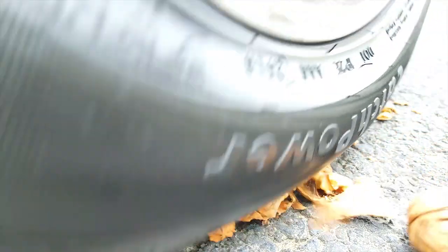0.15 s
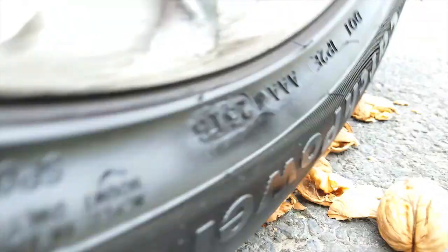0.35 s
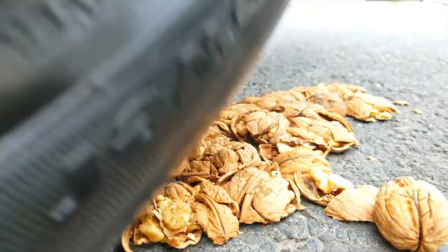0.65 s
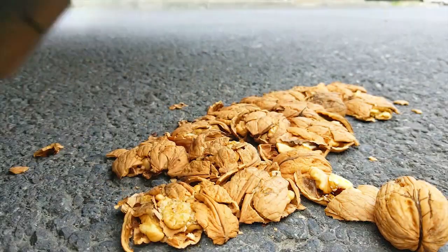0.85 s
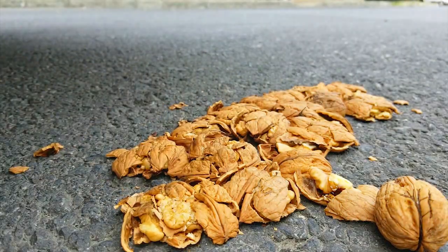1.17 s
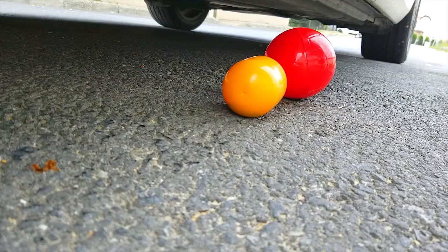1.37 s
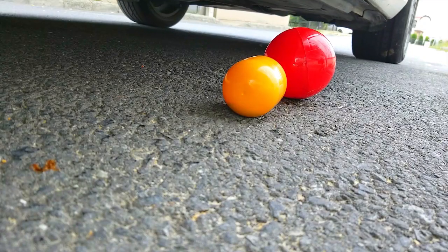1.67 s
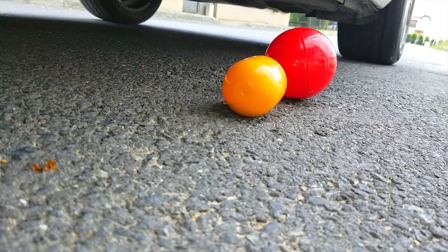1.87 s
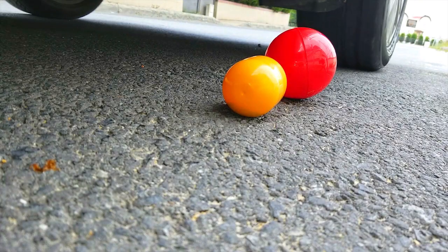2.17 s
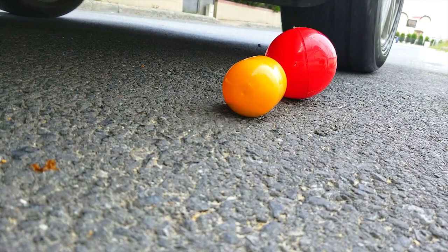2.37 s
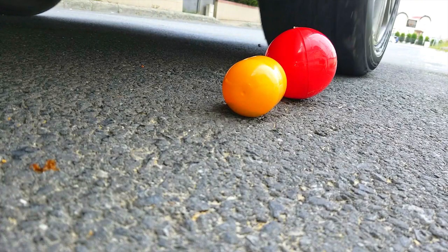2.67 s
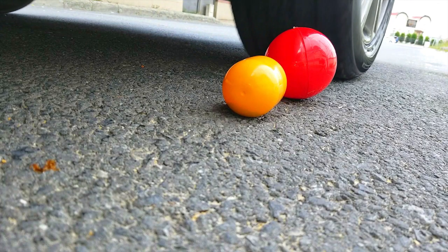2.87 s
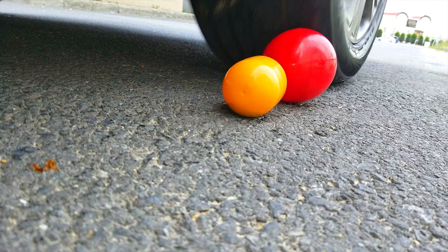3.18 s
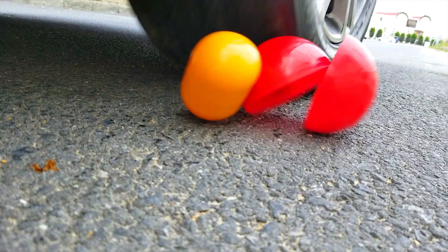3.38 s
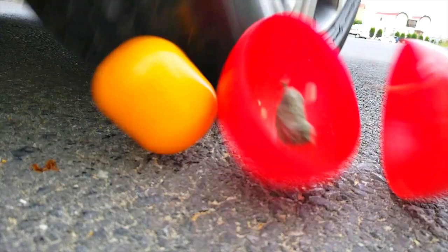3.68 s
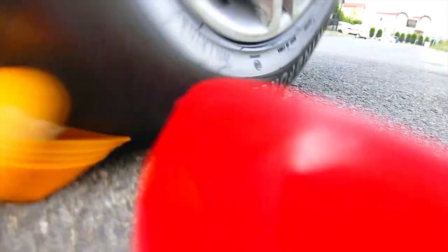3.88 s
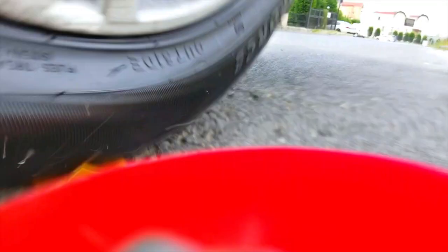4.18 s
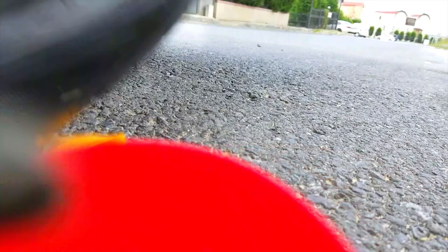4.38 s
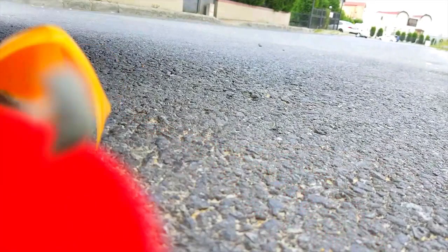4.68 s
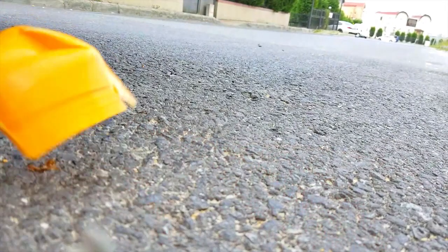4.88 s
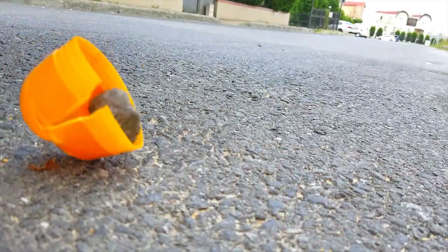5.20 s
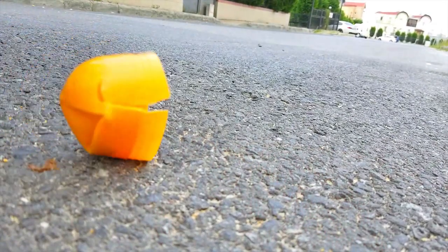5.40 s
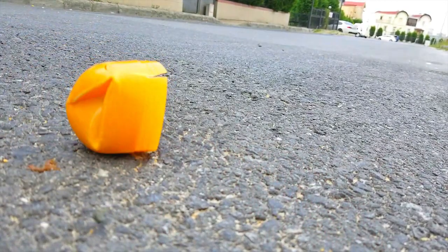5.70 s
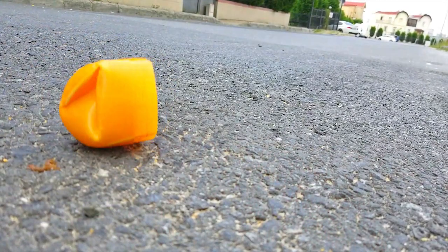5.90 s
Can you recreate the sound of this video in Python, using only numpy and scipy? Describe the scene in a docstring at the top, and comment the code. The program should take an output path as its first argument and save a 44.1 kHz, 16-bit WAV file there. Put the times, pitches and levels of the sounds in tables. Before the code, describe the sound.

Close, dry road-level sound outdoors, in three abruptly joined parts. From 0 to 0.5 s a tyre crushes walnuts: rapid irregular snaps, hollow woody knocks and bright splintering over gritty crunch, densest before 0.25 s. Faint crumbs tick from about 0.55 s while a low idling engine emerges; at 0.95 s comes a soft car knock, then a very thin, high brake squeal. At 1.27 s a hard cut brings a much fuller approaching car, its throbbing exhaust and tyre hiss dropping to a rougher idle, with a small surge near 1.95 s. At 2.15 s everything becomes quarter-speed, dark and treble-less: slow bass flutter under a dull rush. From 2.9 to 4.05 s plastic capsules creak and crack in deep, hollow, varied blows, some overloading. Loose halves then bounce, strongest around 4.7 s, rattling and rolling lightly until 6 s, with a faint lingering ring, as the car fades.

```python
"""A car tyre crunches walnuts on asphalt, close by, over the idling engine: noise bursts snap, knock and ring.
A soft knock of the car follows, and a brake sings faintly, as one sine. After a hard cut the car drives up:
firing pulses and throbbing noise. After a second cut all runs at quarter speed: the engine flutters slowly
under a dull rush. Two plastic capsules crack under the tyre, deep and dull, as dying modes and noise, and
their halves bounce, rattle and roll away."""
import sys
import numpy as np
from scipy import signal
from scipy.io import wavfile
from scipy.ndimage import uniform_filter1d

SR = 44100
rng = np.random.default_rng(int(sys.argv[2]) if len(sys.argv) > 2 else 0)


def master_out(mix):
    """Clip the mix to full scale and print it as 16-bit PCM to the path in sys.argv[1]."""
    frames = np.transpose(np.atleast_2d(mix))
    ceiling = np.clip(frames, -1, 1)
    pcm = np.round(ceiling * 32767).astype(np.int16)
    wavfile.write(sys.argv[1], SR, pcm)


N = 266805
TIME_S = np.arange(N) / SR

# Shell snaps, and one late soft knock of the car at 0.952 s.
# Each row: start in seconds, hollow knock level in dB, crack level in dB, both before trim.
NUT_AND_CAR_BLOWS = [(0.039, -20, -23.5), (0.066, -16, -28), (0.087, -38, -25.5), (0.115, -23.5, -54),
                     (0.142, -29, -37), (0.158, -24.5, -56), (0.17, -40, -29.5), (0.1799, -24.5, -24.5),
                     (0.2032, -19, -20.5), (0.214, -26, -22), (0.281, -25.5, -31), (0.316, -28, -29),
                     (0.321, -37, -29.5), (0.341, -29, -36), (0.366, -55, -35.5), (0.396, -32, -34),
                     (0.427, -29.5, -36.5), (0.493, -26, -37.5), (0.521, -26.5, -31.5), (0.952, -34, -66)]
# Spectrum of a hollow knock. Each row: frequency in Hz, level in dB per Hz.
NUT_KNOCK_SPECTRUM = [(120, -25.5), (200, 1.5), (220, -9), (274, -9.5), (307, -6.5), (530, 1.5),
                      (1200, -15.5), (1560, -46.5), (2640, -120)]
# Spectrum of a shell's crack. Each row: frequency in Hz, level in dB per Hz.
NUT_CRACK_SPECTRUM = [(590, -19), (1000, -8.5), (1350, -9.5), (1630, -11.5), (2550, -8), (2800, -10.5),
                      (5000, -8.5), (6500, -18.5), (11000, -120)]
# Spectrum of shell splinters. Each row: frequency in Hz, level in dB per Hz.
NUT_SPLINTER_SPECTRUM = [(4000, -12.5), (4700, -4.5), (5600, 4.5), (7000, -1.5), (8400, 0), (9900, -2.5),
                         (11000, 1.5), (12000, 2.5), (13200, 3.5), (14000, -7.5), (14600, -17.5),
                         (15500, -29.5)]
# Capsules cracking under the tyre. Each row: start in seconds, thud frequency in Hz, thud level in dB,
# ring frequency in Hz, ring level in dB before trim.
CAPSULE_CRACKS = [(2.9, 555, -17, 660, -12.5), (2.912, 520, -19.5, 793, -23), (2.937, 580, -26.5, 820, -28),
                  (2.961, 233, -12.5, 636, -16), (2.972, 115.7, -10.5, 1144, -20),
                  (3.004, 113, -16, 734, -17.5), (3.066, 103.5, -17, 1470, -15),
                  (3.094, 116, -27.5, 1330, -9), (3.181, 170, -23, 1230, -12),
                  (3.195, 218.6, -12.5, 1230, -15), (3.243, 230, -20, 1120, -21.5),
                  (3.298, 165, -29.5, 1153, -24), (3.322, 150, -18.5, 807, -15),
                  (3.339, 381, -20.5, 958, -15.5), (3.351, 410, -27.5, 1114, -11.5),
                  (3.412, 550, -30, 1010, -18.5), (3.472, 507, -25, 610, -17.5),
                  (3.518, 183, -13.5, 1440, -18), (3.552, 280, -30, 1130, -11.5),
                  (3.584, 152, -24.5, 930, -15), (3.641, 156.6, -9, 1480, -21.5),
                  (3.7, 270, -22, 1520, -15.5), (3.726, 550, -18, 1530, -16), (3.768, 276, -13.5, 930, -22),
                  (3.809, 342, -25, 1155, -19.5), (3.887, 105, -10, 846, -14),
                  (3.894, 253, -14, 620, -18.5), (3.972, 246, -26, 1070, -14),
                  (4.03, 544, -27, 1120, -14.5)]
# Spectrum of the capsule body. Each row: frequency in Hz, level in dB per Hz.
PLASTIC_BODY_SPECTRUM = [(210, -26.5), (350, 1.5), (436, -7), (550, 0.5), (675, -21.5), (731, -4), (910, 1),
                         (1220, -2.5), (1560, -1), (2000, -19.5), (2600, -17.5), (4400, -120)]
# Spectrum of the plastic's snap. Each row: frequency in Hz, level in dB per Hz.
PLASTIC_SNAP_SPECTRUM = [(1000, -36.5), (1700, 1.5), (2010, 1.5), (2560, 0.5), (2830, -2.5), (3370, 5),
                         (3820, 1), (4000, -4), (5200, -51), (8800, -120)]
# Position of the plastic as it is pushed along. Each row: time in seconds, left over right in dB.
PLASTIC_PAN = [(2.9, 1), (3.33, 1), (3.5, 6.5), (3.9, 5), (4.15, 8.5), (4.7, 9.5), (5.1, 4), (5.4, -3.5),
               (5.8, 5)]
# Loose halves landing on the road. Each row: start in seconds, thud level in dB, ring level in dB before trim.
HALF_BOUNCES = [(4.161, -21, -26), (4.22, -21.5, -43), (4.285, -31, -36), (4.364, -30, -29),
                (4.369, -18.5, -15.5), (4.619, -17.5, -27.5), (4.686, -11, -25.5), (4.707, -25.5, -25.5),
                (4.725, -16.5, -19), (4.743, -22, -19), (4.758, -20, -25), (4.806, -23, -29),
                (4.9, -35, -39), (4.966, -34, -44), (5.029, -29, -32.5), (5.074, -37.5, -35.5),
                (5.088, -22.5, -32), (5.22, -34, -46), (5.272, -41, -41), (5.362, -24.5, -30.5),
                (5.407, -26.5, -34), (5.42, -32.5, -29.5), (5.537, -33.5, -39.5), (5.581, -33.5, -42.5),
                (5.775, -34, -33), (5.821, -36.5, -31), (5.854, -32.5, -27.5), (6.035, -52, -37.5)]
# Long faint ring of a shell flung against the road. Each row: frequency in Hz, starting level in dB, t60 in seconds.
SHELL_RING_MODES = [(2880, -60, 1.7), (3311, -65.5, 0.74), (3330, -62.5, 2.4)]
# Plastic straining under the tread. Each row: start in seconds, length in seconds, level in dB.
PLASTIC_CREAKS = [(2.898, 0.19, -18.5), (3.639, 0.12, -24), (3.886, 0.083, -25)]
# Spectrum of the plastic's low groan. Each row: frequency in Hz, level in dB per Hz.
GROAN_SPECTRUM = [(60, 4.5), (160, 3.5), (330, -4), (560, -9.5), (800, -7.5)]
# Engine speed as the car drives up. Each row: time in seconds, firings per second.
DRIVE_FIRING_RATE = [(1.28, 48.6), (1.35, 48.3), (1.52, 38.8), (1.64, 35.5), (2.13, 39.8)]
# Spectrum of the driving exhaust pipe. Each row: frequency in Hz, level in dB per Hz.
DRIVE_PIPE_SPECTRUM = [(35, -12), (48, -8.5), (75, -2), (125, -3.5), (172, 4), (205, -10), (330, -14.5),
                       (440, -31), (550, -25), (700, -17)]
# Spectrum of the driving tyres. Each row: frequency in Hz, level in dB per Hz.
DRIVE_ROAR_SPECTRUM = [(150, -28.5), (260, -7.5), (343, -7), (437, -11), (691, -10.5), (896, -18.5),
                       (1100, -17), (1430, -46.5), (2420, -120)]
# Spectrum of the driving car's hiss. Each row: frequency in Hz, level in dB per Hz.
DRIVE_HISS_SPECTRUM = [(530, -19), (900, 1), (1070, -10), (1230, -0.5), (1470, -1.5), (1770, 3.5),
                       (1950, 0), (2830, -1.5), (3150, -5.5), (4520, -7.5), (5280, -11.5), (7770, -8),
                       (9310, -17), (15200, -14), (16000, -20.5)]
# Loudness of the car passing at quarter speed. Each row: time in seconds, relative level in dB.
PASSING_LEVEL = [(2.17, -0.5), (2.56, 2), (2.8, -1.5), (3.15, 0), (3.42, -4.5), (3.72, 1.5), (4.1, -10),
                 (4.55, -18.5), (4.82, -14), (5.2, -17), (6, -21.5)]
# Spectrum of the slowed exhaust pipe. Each row: frequency in Hz, level in dB per Hz.
SLOW_PIPE_SPECTRUM = [(8.8, -24), (15, 7), (28, -3.5), (65, -9.5), (124, -13), (178, -26), (206, -44.5),
                      (220, -30.5), (290, -56), (480, -120)]
# Spectrum of the slowed tyres. Each row: frequency in Hz, level in dB per Hz.
SLOW_ROAR_SPECTRUM = [(100, -18), (170, 4.5), (215, -9.5), (303, -7.5), (392, -7), (486, -6), (617, -14),
                      (800, -27), (1040, -42.5), (1760, -120)]
# Spectrum of the slowed hiss. Each row: frequency in Hz, level in dB per Hz.
SLOW_HISS_SPECTRUM = [(380, -14.5), (650, 2), (696, -1), (995, -5), (1190, -3.5), (1430, -5), (1550, 0.5),
                      (1800, -13), (2020, -10.5), (2420, -10), (2950, -11.5), (3440, -5.5), (4000, -16),
                      (5200, -65), (8800, -120)]
# Car beside the nuts. Each row: time in seconds, firing hum level in dB, rumble level in dB, both before trim.
IDLE_LEVELS = [(0.0, -56.5, -49), (0.654, -33.5, -36), (1.25, -31, -39.5)]
# Spectrum of the idling exhaust. Each row: frequency in Hz, level in dB per Hz.
IDLE_RUMBLE_SPECTRUM = [(29, -30), (50, -10), (65, -9.5), (228, -21), (258, -29), (278, -23.5),
                        (411, -34.5), (483, -31), (1000, -55), (1300, -101.5), (2200, -120)]
# Spectrum of the idling car's hiss. Each row: frequency in Hz, level in dB per Hz.
IDLE_HISS_SPECTRUM = [(530, -13.5), (900, -1), (975, -7), (1770, -8.5), (5400, -24.5), (6270, -31.5),
                      (7280, -19.5), (7880, -16.5), (8740, -36.5), (12100, -21), (14000, -46)]
# Brake squeal. Each row: time in seconds, level in dB before trim.
BRAKE_LEVEL = [(0.9, -116), (0.966, -46.5), (1.26, -76)]
# Whines under the idling car. Each row: frequency in Hz, level in dB.
WHINE_BANDS = [(1830, -62), (2880, -69)]

CUT_S, SLOW_S = 1.272, 2.148
NUT_EDGE_HZ, SLOW_EDGE_HZ, EDGE_HZ = 14500, 4050, 16000
# harder cracks throw disproportionately more splinters (dB per dB)
SPLINTER_FROM_DB, SPLINTER_GROWTH = -34.5, 1.3
# the crunch holds while the tread is on the shells, then dies to the ticking of settling crumbs
CRUNCH_DB, CRUNCH_SAG_DB_PER_S, SETTLE_DB = -32.5, 7.5, -65.5
TREAD_OFF_S, CRUNCH_RELEASE_DB_PER_S = 0.38, 195
DEBRIS_FROM_S = 0.556
# the snap grows with the stronger of thud and ring (dB per dB)
SNAP_DB, SNAP_GROWTH = -16, 0.48
# the wall gives a little before it breaks: this much earlier (range) and weaker
GIVE_S, GIVE_DB = (0.004, 0.01), -14
# air and wall of a half; the spread is the standard deviation of log pitch between landings
CUP_HZ, WALL_HZ, PITCH_SPREAD = 267.3, 1042, 0.051
FREE_CUP_CYCLES = 2.2
BOUNCE_SNAP_DB = -8.5  # relative to the ring
# a pebble inside the cup rattles: this much later (range) and weaker
RATTLE_S, RATTLE_DB = (0.015, 0.028), -15.5
ROLL_S, ROLL_DB = (4.8, 5.75), -40
FLUNG_S = 4.745
CREAK_ATTACK_S, CREAK_RELEASE_DB_PER_S = 0.017, 211
# each part fades as the throttle closes
PIPE_EASE_DB_PER_S, ROAR_EASE_DB_PER_S, HISS_EASE_DB_PER_S = 15.5, 6, 5
# the low rumble swells once
SURGE_S, SURGE_WIDTH_S, SURGE_DB = 1.95, 0.032, 6
# how far bass and hiss follow the tyre roar (dB per dB)
PIPE_FOLLOWS, HISS_FOLLOWS = 1.09, 1.22
PIPE_LAG_S = 0.18  # the tailpipe passes after the wheel
BRAKE_HZ = 7670


def amp(db):
    """Decibels to gain."""
    return 10 ** (np.asarray(db) / 20)


def unit(x):
    """Scales to rms 1."""
    return x / np.sqrt(np.mean(x ** 2) + 1e-20)


def blow(x):
    """Scales a two-channel blow to the energy of 10 ms at rms 1."""
    mean_energy = np.sum(x ** 2) / 2
    return x / np.sqrt(mean_energy / (SR / 100) + 1e-20)


def curves(rows):
    """Each column of a table as a curve over the whole time."""
    time_s, *columns = np.transpose(rows)
    return [np.interp(TIME_S, time_s, column) for column in columns]


def after(s):
    """Seconds gone by since time s, zero before it."""
    return np.maximum(TIME_S - s, 0)


def colour(x, spectrum, size=4096):
    """Minimum-phase filter with the given spectrum, falling 40 dB per octave outside it."""
    hz, db = np.transpose(spectrum)
    octave = np.log2(np.abs(np.fft.fftfreq(size, 1 / SR)) + 1)
    knots = np.log2(hz + 1)
    outside = np.abs(octave - np.clip(octave, knots[0], knots[-1]))
    gain_db = np.maximum(np.interp(octave, knots, db) - 40 * outside, -100)
    log_gain = np.log(amp(gain_db))
    taps = np.fft.ifft(np.exp(np.conj(signal.hilbert(log_gain)))).real
    return signal.fftconvolve(x, taps[None], axes=1)[:, :x.shape[1]]


def lowpass(x, hz):
    """Steep linear-phase band limit."""
    taps = signal.firwin(801, hz, window=("kaiser", 9), fs=SR)
    return signal.oaconvolve(x, taps[None], "same")


def pair(size, shared):
    """White noise at two microphones with a share of power in common."""
    noise = rng.standard_normal((3, size))
    shared = np.clip(shared, 0, 1)
    return np.sqrt(shared) * noise[2] + np.sqrt(1 - shared) * noise[:2]


def clumps(size, span_s, depth_db):
    """Random gain that bunches a noise into grains about span_s long."""
    span = max(int(span_s * SR), 1)
    sway = unit(uniform_filter1d(rng.standard_normal(size), span))
    return unit(amp(depth_db * np.clip(sway, -2, 2)))


def panned(x, pan_db):
    """Leans a sound to the left by pan_db."""
    return x * amp([[pan_db / 2], [-pan_db / 2]])


def placed(x, pan_db, lead_s):
    """Leans a sound to the left by pan_db and delays the right by lead_s."""
    left, right = x
    delay = int(max(lead_s, 0) * SR)
    late_right = np.pad(right, (delay, 0))[:len(left)]
    return panned(np.array([left, late_right]), pan_db)


def add(mix, s, sound):
    """Mixes a sound in at time s."""
    start = max(round(s * SR), 0)
    part = mix[:, start:][:, :sound.shape[1]]
    part += sound[:, :part.shape[1]]


def mode(t, hz, fall_s):
    """A sine dying by 1/e in fall_s."""
    return np.sin(2 * np.pi * hz * t) * np.exp(-t / fall_s)


def rung(x, t, hz, fall_s):
    """Passes a blow through one resonance."""
    ringing = signal.fftconvolve(x, mode(t, hz, fall_s)[None], axes=1)
    return blow(ringing[:, :x.shape[1]])


def fracture(t, fall_s, tail_db, tail_s, shared, grain_s, grain_db):
    """A run of tiny uneven breaks that dies fast, plus the longer scatter of its fragments."""
    breaks = pair(len(t), shared) * np.exp(-t / fall_s)
    scatter = amp(tail_db) * pair(len(t), 0) * np.exp(-t / tail_s)
    return (breaks + scatter) * clumps(len(t), grain_s, grain_db)


def wash(spectrum, level_db, shared, throb=1):
    """Coloured noise on a level curve, pulsing with throb."""
    return amp(level_db) * unit(colour(pair(N, shared) * throb, spectrum))


def exhaust(firing_hz, spectrum, uneven, rough, shared):
    """One pulse and one puff of gas a firing, through the pipe; also returns the throb."""
    turns = np.cumsum(firing_hz) / SR
    firings = np.diff(np.floor(turns), prepend=0)
    pulses = firings * (1 + uneven * rng.standard_normal(N))
    throb = unit(1 + np.exp(-(turns % 1) / 0.505))
    gas = unit(pulses - pulses.mean()) + rough * throb * pair(N, shared)
    return unit(colour(gas, spectrum, size=16384)), throb


def walnuts_and_car_knock(knock_db=-3.5, crack_db=-1, splinter_db=-1, chip_db=-5, shard_db=-6,
                          pan_db=2.5, pan_spread_db=2):
    """Shells snap, knock hollow and ring a chip and a shard; the late car knock is nearly all hollow knock."""
    out, t = np.zeros((2, N)), np.arange(SR // 6) / SR
    for s, knock, crack in NUT_AND_CAR_BLOWS:
        splinter = SPLINTER_FROM_DB + SPLINTER_GROWTH * (crack - SPLINTER_FROM_DB)
        split = fracture(t, fall_s=0.0022, tail_db=-9.5, tail_s=0.0081, shared=0.328, grain_s=0.0004, grain_db=-1.5)
        push = fracture(t, fall_s=0.00077, tail_db=-23.5, tail_s=0.015, shared=0.96, grain_s=0.0013, grain_db=-1.5)
        sound = amp(knock + knock_db) * blow(colour(push, NUT_KNOCK_SPECTRUM))
        sound += amp(crack + crack_db) * blow(colour(split, NUT_CRACK_SPECTRUM))
        sound += amp(crack + chip_db) * rung(push, t, rng.uniform(1550, 1850), fall_s=0.0023)
        shard = amp(shard_db) * rung(push, t, rng.uniform(10530, 13710), fall_s=0.0012)
        bright = blow(colour(split, NUT_SPLINTER_SPECTRUM)) + shard
        sound += amp(splinter + splinter_db) * panned(bright, pan_db=7)
        add(out, s, placed(sound, pan_db + pan_spread_db * rng.uniform(-1, 1), lead_s=0.0004))
    return out


def crumbs(per_s=2500, spread_db=3, knock_db=-4, crack_db=-6, splinter_db=-1):
    """Countless small fragments break in clusters between the large snaps."""
    crunch = CRUNCH_DB - CRUNCH_SAG_DB_PER_S * TIME_S - CRUNCH_RELEASE_DB_PER_S * after(TREAD_OFF_S)
    level_db = np.maximum(crunch, SETTLE_DB)
    breaks = rng.random(N) < per_s / SR
    sizes = amp(spread_db * np.minimum(rng.exponential(1, N), 3)) * breaks
    grains = sizes * clumps(N, span_s=0.0057, depth_db=4.5) * pair(N, 0.3)
    sound = amp(knock_db) * unit(colour(grains, NUT_KNOCK_SPECTRUM))
    sound += amp(crack_db) * unit(colour(grains, NUT_CRACK_SPECTRUM))
    sound += amp(splinter_db) * unit(colour(grains, NUT_SPLINTER_SPECTRUM))
    return panned(amp(level_db) * sound, pan_db=0.5)


def debris(gap_s=0.05, slowing=1.2, first_db=-48, step_db=-3, count=5):
    """Bits of shell drop off the tread with fainter ticks, at gaps that tend to widen."""
    out, t, s = np.zeros((2, N)), np.arange(SR // 10) / SR, DEBRIS_FROM_S
    for k in range(count):
        tick = fracture(t, fall_s=0.0011, tail_db=-24, tail_s=0.015, shared=0.37, grain_s=0.0004, grain_db=-8)
        add(out, s, amp(first_db + k * step_db) * blow(colour(tick, NUT_SPLINTER_SPECTRUM)))
        s += gap_s * slowing ** k * rng.uniform(0.8, 1.2)
    return out


def plastic(s, thud_hz, thud, ring_hz, ring, snap, ring_db=-1, body_db=-4, high_db=-4, rise_s=0.0014, cup_cycles=0.94):
    """One blow at time s snaps the plastic, rings its wall and thumps the air in the cup."""
    t = np.arange(SR // 5) / SR
    split = fracture(t, fall_s=0.0077, tail_db=-26.5, tail_s=0.035, shared=0.081, grain_s=0.0021, grain_db=1.5)
    push = fracture(t, fall_s=0.0014, tail_db=-24.0, tail_s=0.022, shared=0.3, grain_s=0.0037, grain_db=2.5)
    cup = mode(t, thud_hz, cup_cycles / thud_hz) * (1 - np.exp(-t / rise_s)) * np.ones((2, 1))
    sound = amp(thud) * blow(cup)
    sound += amp(ring + ring_db) * rung(push, t, ring_hz, fall_s=0.0037)
    sound += amp(ring + body_db) * blow(colour(split, PLASTIC_BODY_SPECTRUM))
    # each point of impact favours another high mode of the wall
    high = amp(high_db) * rung(push, t, rng.uniform(2000, 3853), fall_s=0.0023)
    sound += amp(snap) * blow(blow(colour(split, PLASTIC_SNAP_SPECTRUM)) + high)
    pan_db = np.interp(s, *np.transpose(PLASTIC_PAN))
    # only pieces far to the left reach one microphone clearly first; slowing stretches that lead
    lead_s = np.interp(pan_db, [6, 8.5], [0, 0.003])
    return s, placed(sound, pan_db, lead_s)


def capsules():
    """The capsules give way crack by crack; as they cave in, each crack has its own pitches."""
    out = np.zeros((2, N))
    for s, thud_hz, thud, ring_hz, ring in CAPSULE_CRACKS:
        snap = SNAP_DB + SNAP_GROWTH * max(thud, ring)
        early_s = s - rng.uniform(*GIVE_S)
        add(out, *plastic(early_s, thud_hz, thud + GIVE_DB, ring_hz, ring + GIVE_DB, snap + GIVE_DB))
        add(out, *plastic(s, thud_hz, thud, ring_hz, ring, snap))
    return out


def landing(s, thud, ring, bump_hz=170, bump_db=-11, bump_s=0.008):
    """A loose half bumps the road; with no load its cup rings longer and purer, near its own two pitches."""
    cup, wall = np.exp(PITCH_SPREAD * rng.standard_normal(2))
    _, sound = plastic(s, CUP_HZ * cup, thud, WALL_HZ * wall, ring, ring + BOUNCE_SNAP_DB,
                       ring_db=-1.5, body_db=-5.5, high_db=-5.5, cup_cycles=FREE_CUP_CYCLES)
    bump = blow(mode(TIME_S[:sound.shape[1]], bump_hz, bump_s) * np.ones((2, 1)))
    return s, sound + amp(thud + bump_db) * panned(bump, pan_db=5.5)


def halves(roll_ring_db=-7, count=15):
    """The loose halves bounce, rattle and roll on the rim in light taps; a flung shell rings on faintly."""
    out, t = np.zeros((2, N)), np.arange(SR) / SR
    for s, thud, ring in HALF_BOUNCES:
        add(out, *landing(s, thud, ring))
        add(out, *landing(s + rng.uniform(*RATTLE_S), thud + RATTLE_DB, ring + RATTLE_DB))
    for s in np.interp(np.arange(count) + rng.random(count), [0, count], ROLL_S):
        add(out, *landing(s, ROLL_DB, ROLL_DB + roll_ring_db))
    ringing = sum(amp(db) * mode(t, hz, t60_s / np.log(1000)) for hz, db, t60_s in SHELL_RING_MODES)
    add(out, FLUNG_S, panned(ringing, pan_db=13))
    return out


def creaking(body_db=-6, snap_db=-11, groan_db=0):
    """Plastic sticks and slips on the asphalt under load: each strain builds quickly, holds and lets go."""
    strain = np.zeros(N)
    for s, length_s, db in PLASTIC_CREAKS:
        attack = np.minimum(after(s) / CREAK_ATTACK_S, 1)
        strain += attack * amp(db - CREAK_RELEASE_DB_PER_S * after(s + length_s))
    slips = clumps(N, span_s=0.0057, depth_db=2.0)
    low = wash(GROAN_SPECTRUM, groan_db, shared=0.39, throb=slips)
    body = wash(PLASTIC_BODY_SPECTRUM, body_db, shared=0.23, throb=slips)
    snap = wash(PLASTIC_SNAP_SPECTRUM, snap_db, shared=0.23, throb=slips)
    return panned(strain * (low + body + snap), pan_db=2.0)


def driving(pipe_db=-11.0, roar_db=-21, hiss_db=-25.5):
    """The engine drops from a touch of throttle to a rougher idle as the car rolls up."""
    firing_hz, = curves(DRIVE_FIRING_RATE)
    coasting_s = after(CUT_S)
    surge_db = SURGE_DB * np.exp(-((TIME_S - SURGE_S) / SURGE_WIDTH_S) ** 2)
    rough = np.interp(TIME_S, [1.55, 1.85], [0.3, 1.1])
    pipe, throb = exhaust(firing_hz, DRIVE_PIPE_SPECTRUM, uneven=0.14, rough=rough, shared=0.3)
    engine = amp(pipe_db - PIPE_EASE_DB_PER_S * coasting_s + surge_db) * pipe
    tyres_db = roar_db - ROAR_EASE_DB_PER_S * coasting_s + surge_db
    tyres = wash(DRIVE_ROAR_SPECTRUM, tyres_db, shared=0.84, throb=throb)
    air = wash(DRIVE_HISS_SPECTRUM, hiss_db - HISS_EASE_DB_PER_S * coasting_s, shared=0.19, throb=throb)
    return placed(engine + tyres + air, pan_db=1.7, lead_s=0.0004)


def slowed_car(firing_hz=7.9, pipe_db=-19.0, roar_db=-30.5, hiss_db=-35.0):
    """At quarter speed the idle is a deep uneven flutter under a dull rush."""
    near_db, = curves(PASSING_LEVEL)
    pipe, _ = exhaust(np.full(N, firing_hz), SLOW_PIPE_SPECTRUM, uneven=0.5, rough=1.8, shared=0.55)
    grit = clumps(N, span_s=0.016, depth_db=1.2)
    gusts = clumps(N, span_s=0.06, depth_db=1.5)
    tyres = wash(SLOW_ROAR_SPECTRUM, roar_db + near_db, shared=0.1, throb=grit)
    air = wash(SLOW_HISS_SPECTRUM, hiss_db + HISS_FOLLOWS * near_db, shared=0.054, throb=gusts)
    pipe_near_db = np.interp(TIME_S - PIPE_LAG_S, TIME_S, near_db)
    engine = amp(pipe_db + PIPE_FOLLOWS * pipe_near_db) * pipe
    return panned(engine + tyres + air, pan_db=2.5)


def idling(firing_hz=37.9, hum_db=0, rumble_db=1, hiss_db=-57.5, brake_db=-1):
    """The engine hums at its firing rate over pulsed rumble and hiss; a brake pad sings as a sine."""
    hum, rumble = curves(IDLE_LEVELS)
    squeal, = curves(BRAKE_LEVEL)
    firing = amp(hum + hum_db) * unit(np.sin(2 * np.pi * firing_hz * TIME_S))
    pipe, throb = exhaust(np.full(N, firing_hz), IDLE_RUMBLE_SPECTRUM, uneven=0.56, rough=1.3, shared=0.47)
    braking = TIME_S > BRAKE_LEVEL[0][0]
    brake = amp(squeal + brake_db) * unit(np.sin(2 * np.pi * BRAKE_HZ * TIME_S)) * braking
    air = wash(IDLE_HISS_SPECTRUM, hiss_db, shared=0.373, throb=throb)
    return panned(firing + amp(rumble + rumble_db) * pipe + air + brake, pan_db=4.0)


def whines(fall_s=0.0026):
    """Moving parts of the engine whistle faintly: noise through two resonances."""
    t = TIME_S[:SR // 10]
    return sum(amp(db) * unit(rung(pair(N, 0.31), t, hz, fall_s)) for hz, db in WHINE_BANDS)


def scene():
    """Three shots joined by hard cuts; loud cracks overload the microphone, and slowing takes the treble away."""
    nuts = np.tanh(walnuts_and_car_knock() + crumbs() + debris() + idling() + whines())
    nuts = lowpass(nuts, NUT_EDGE_HZ)
    slow = np.clip(slowed_car() + creaking() + capsules() + halves(), -0.92, 0.92)
    slow = lowpass(slow, SLOW_EDGE_HZ)
    return np.where(TIME_S < CUT_S, nuts, np.where(TIME_S < SLOW_S, driving(), slow))


def record(dry):
    """Clips the highest peaks, then limits the band."""
    return lowpass(np.clip(dry, -0.96, 0.96), EDGE_HZ)


dry = scene()
out = record(dry)
master_out(out)
```